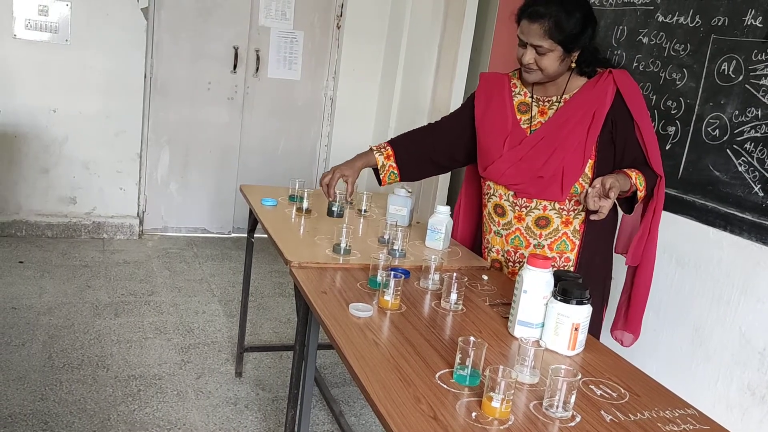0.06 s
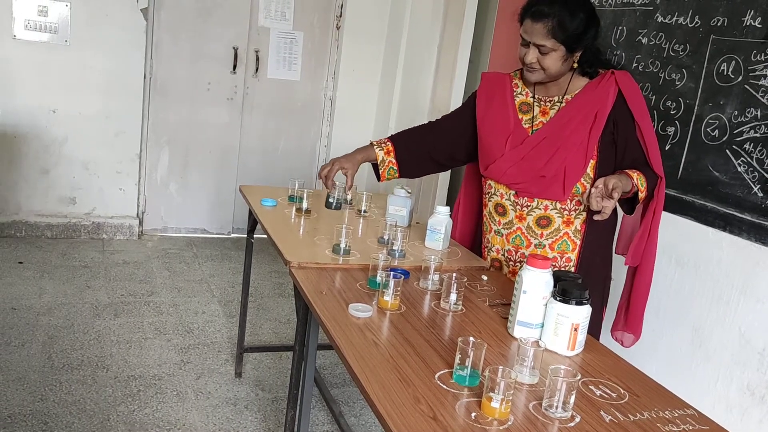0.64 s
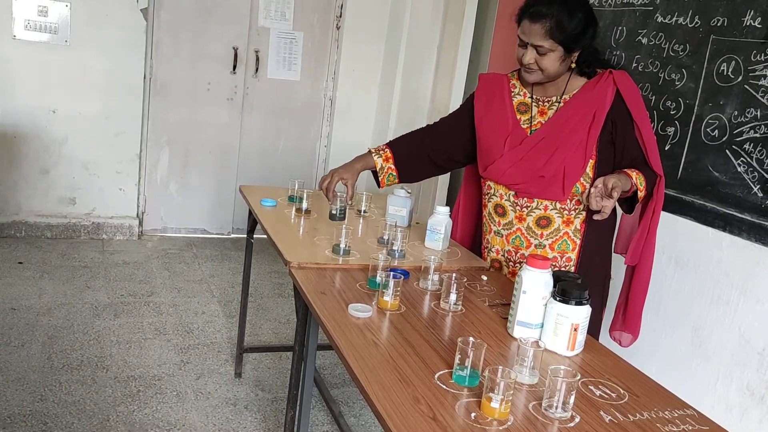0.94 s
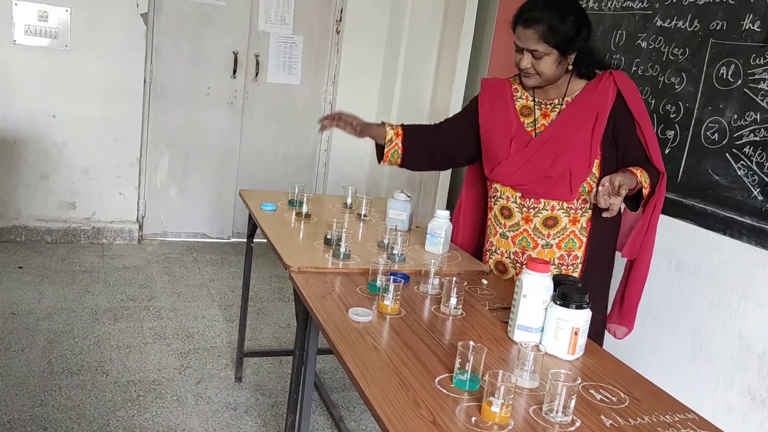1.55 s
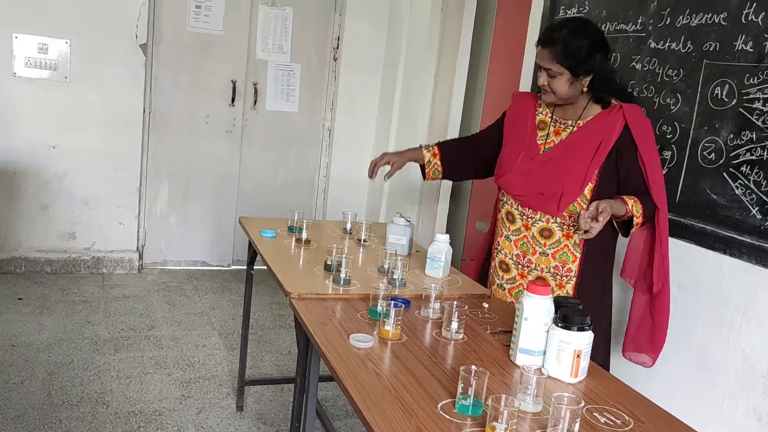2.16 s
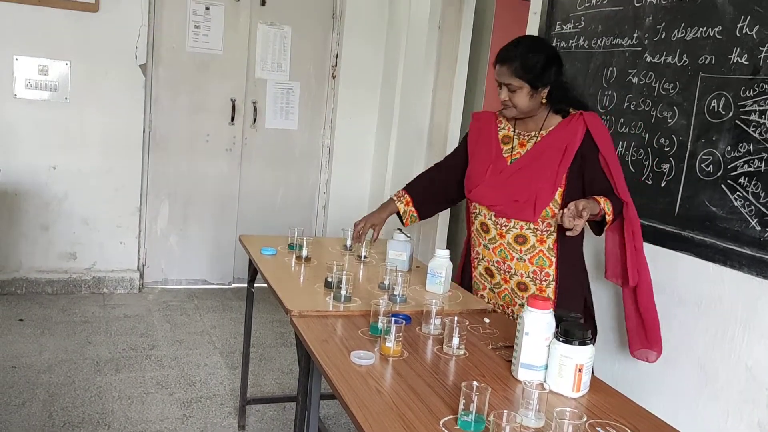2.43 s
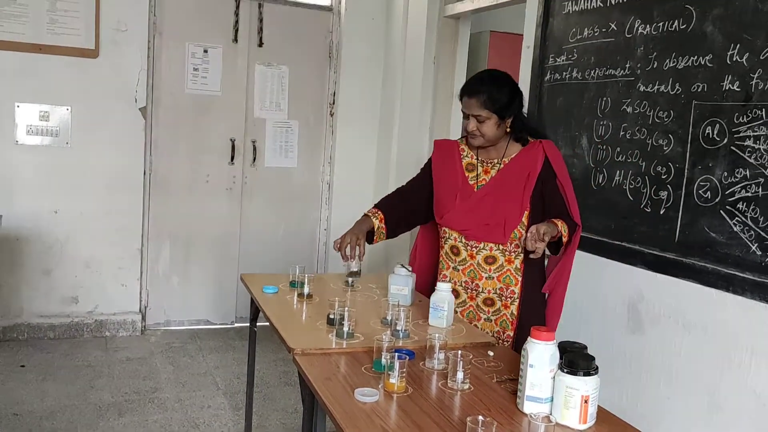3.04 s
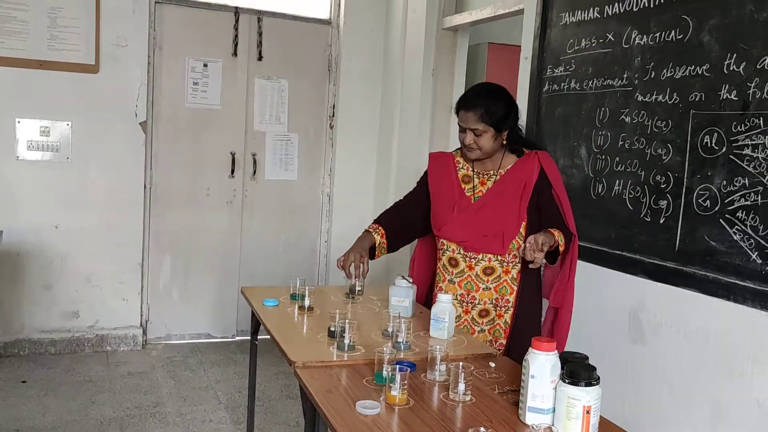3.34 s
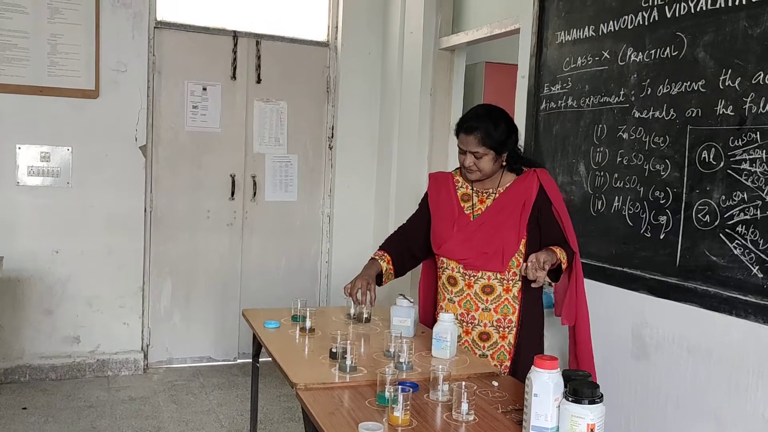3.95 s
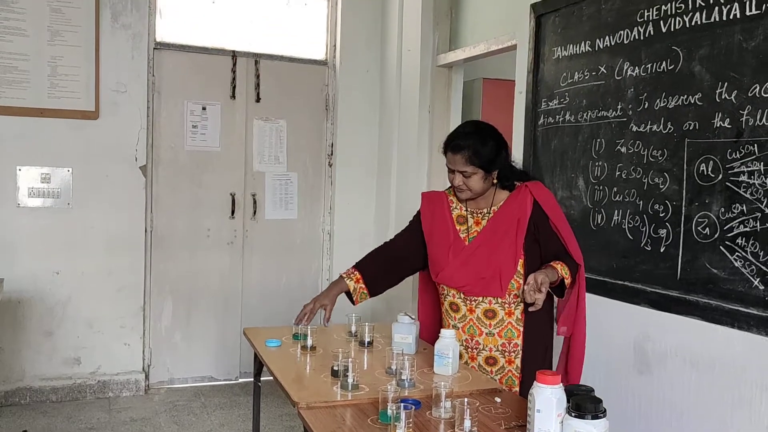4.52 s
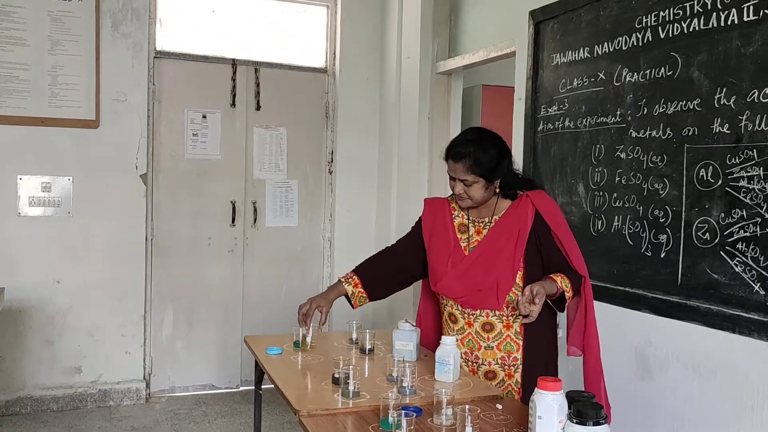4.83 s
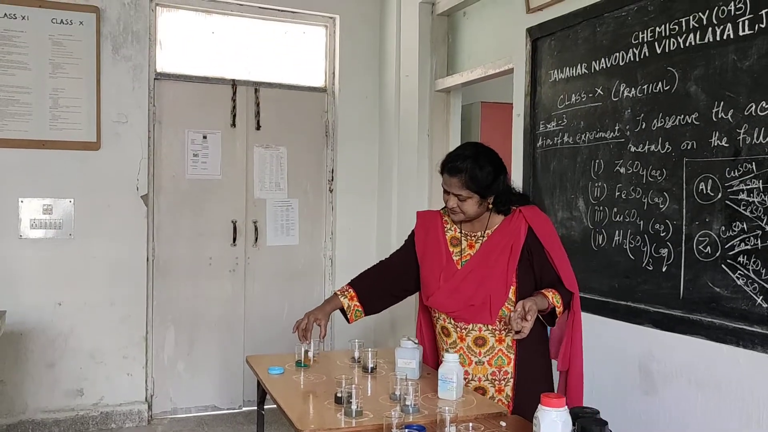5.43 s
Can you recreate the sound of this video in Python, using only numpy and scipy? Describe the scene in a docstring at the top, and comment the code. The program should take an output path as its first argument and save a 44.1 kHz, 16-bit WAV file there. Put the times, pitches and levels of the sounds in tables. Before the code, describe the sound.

A light tick of glass comes first, then a small beaker is set down on a wooden table with a sharp knock that rings around a bare classroom. Clothes and soles brush softly, the glass ticks again in the hand, and a second, duller knock follows. A quiet hush of air and the low rumble of a hand-held microphone lie underneath.

```python
"""In a bare, echoing classroom, small glass beakers are set down twice on a wooden table.
Each landing knocks the table top and sets the room ringing. The glass ticks as it is handled,
and skids faintly on the wood. Clothes and soles brush softly around the knocks,
over the hush of the air and the low rumble of a hand-held microphone."""
import sys
import numpy as np
from scipy import signal
from scipy.fft import rfft, irfft, next_fast_len
from scipy.io import wavfile

SR = 44100
rng = np.random.default_rng(int(sys.argv[2]) if len(sys.argv) > 2 else 0)


def unload_wav(signal):
    """Save mono or channel-first audio to the path in sys.argv[1] as 16-bit WAV at rate SR, clipped to [-1, 1]."""
    wavfile.write(
        sys.argv[1],
        SR,
        np.round(np.clip(np.atleast_2d(signal).T, -1, 1) * 32767).astype(np.int16),
    )


N = 250488
TIME = np.arange(N) / SR
TAIL_TIME = TIME[:2 * SR]   # the room rings for up to 2 s

# How long the room takes to fade by 60 dB: pitch_hz, fade_s
ROOM_FADE = [(100, 3.9), (200, 2.02), (500, 1.764), (1200, 1.4), (2500, 1.303), (5000, 1.12), (9000, 0.83),
             (15000, 0.79)]
# How alike the two sides sound in the room (1 = the same, 0 = unrelated): pitch_hz, likeness
SIDE_LIKENESS = [(35, 0.73), (70, 1), (140, 0.91), (290, 0.84), (640, 0.49), (1400, -0.22), (3000, .02),
                 (15000, -0.082)]
# Notes that ring between the walls: pitch_hz, level_db
ROOM_NOTES = [(166, -51.5), (289, -49.5), (315, -47.5), (411, -46), (606, -43.5), (757, -48), (919, -44),
              (1041, -49.5), (1235, -39), (1291, -56.5), (1338, -49.5), (1411, -54.5), (1581, -52),
              (1711, -50.5), (1813, -61.5), (1901, -57), (2236, -56), (2348, -54.5)]
# Tone of the still air, from bass to treble: pitch_hz, level_db
AIR_TONE = [(35, -44.5), (60, -12), (129, -4), (152, -11), (291, -17.5), (433, -21), (486, -22.5),
            (1420, -27), (1830, -27.5), (3580, -31), (15500, -30.5)]
# Tone of rubbing clothes and soles: pitch_hz, level_db
BRUSH_TONE = [(350, -28.5), (800, -4.5), (1500, -4.5), (3400, -4), (5000, -6.5), (10000, -5),
              (15500, -13.5)]
# Strokes of clothes and soles: peak_s, level_db, width_s, treble_db
BRUSH_STROKES = [(1.324, -50.5, 0.058, 6), (1.657, -62.5, 0.051, 11.5), (2.003, -52, 0.07, 0.5),
                 (2.341, -53, 0.051, 9.5), (2.563, -61, 0.24, -14), (2.869, -52.5, 0.17, 1.5),
                 (3.398, -60, 0.17, -5.5), (4.379, -43, 0.071, -3), (4.893, -65, 0.083, 5),
                 (5.04, -57.5, .092, -8.5)]
# Skids of a beaker on the wood: start_s, length_s, level_db, pitch_hz
BEAKER_SKIDS = [(1.29, .035, -59, 1390), (2.554, .021, -64, 1170)]
# Light touches on the glass: start_s, level_db, click_hz, ring_db
GLASS_TICKS = [(0.0341, -29, 4340, -18), (1.005, -46, 3000, -13), (2.912, -27, 10300, -45),
               (2.921, -33.5, 11160, -27)]
# Notes of a held beaker: multiple_of_glass_hz, level_db, fade_s
GLASS_NOTES = [(.6, -13, 0.0078), (1, 4.5, 0.02), (1.95, -2.5, 0.008), (3.26, -8, 0.013)]
# Tone of the table top under a hard blow: pitch_hz, level_db
TABLE_TONE = [(50, -38), (120, -15), (180, -6), (300, -6.5), (600, -2), (1000, -2.5), (1350, 3), (1750, -5),
              (2400, -7), (3300, -15.5), (4400, -22.5), (6000, -25.5), (10500, -37), (15000, -48)]
# Notes that ring in the table top: pitch_hz, level_db, fade_s
TABLE_NOTES = [(303, -59, 0.091), (629.8, -56.5, 0.19), (1120, -46, 0.044), (1394, -49.5, 0.032),
               (1470, -56.5, 0.062), (1820, -67, .06), (2264, -60, .09)]
# Beaker landings, each with a wall echo: start_s, level_db, treble_db, echo_delay_s, echo_db
BEAKER_LANDINGS = [(1.3242, 10, 2.5, .0183, -5.5), (4.1298, 7.5, -8, 0.0049, 3.5)]
# Tone of the rumble from the hand on the microphone: pitch_hz, level_db
RUMBLE_TONE = [(12, -3.0), (24, -12), (36, 1.5), (50, -27), (80, -18), (250, -77.5), (1000, -100)]


def from_db(db):
    """Turn decibels into a number to multiply by."""
    return 10 ** (np.asarray(db) / 20)


def at_hz(table, hz):
    """Read a table between its rows, giving every octave equal space."""
    known_hz, values = np.transpose(table)
    return np.interp(np.log(np.maximum(hz, 1)), np.log(known_hz), values)


def add(track, sound, start_s):
    """Mix a sound into the track at its start time."""
    start = int(round(start_s * SR))
    track[..., start:start + sound.shape[-1]] += sound[..., :N - start]


def low_pass(sound, corner_hz, order):
    """Dull a sound above the corner pitch."""
    return signal.sosfilt(signal.butter(order, corner_hz, fs=SR, output="sos"), sound)


def ring(hz, fade_s, t, phase=0):
    """A pure note that drops by 60 dB in fade_s."""
    return np.sin(2 * np.pi * hz * t + phase) * np.exp(-np.log(1000) * t / fade_s)


def click(hz, t):
    """A sharp contact of height 1 that dies within six cycles."""
    pulse = np.diff(ring(hz, 6 / hz, t), prepend=0)
    return pulse / np.abs(pulse).max()


def all_around_spectrum(size):
    """Noise arriving from all sides: left and right are alike in the bass, unrelated in the treble."""
    hz = np.fft.rfftfreq(size, 1 / SR)
    mid, side = rfft(rng.standard_normal((2, size)))
    alike = np.clip(at_hz(SIDE_LIKENESS, hz), -1, 1)
    return hz, np.sqrt((1 + alike) / 2) * mid + np.sqrt((1 - alike) / 2) * side * [[1], [-1]]


def noise(tone):
    """Stereo noise with the given tone and an average strength (rms) of 1."""
    hz, white = all_around_spectrum(next_fast_len(N))
    shaped = irfft(white * from_db(at_hz(tone, hz)))[:, :N]
    return shaped / np.sqrt(np.mean(shaped ** 2) + 1e-20)


def classroom(tail_db, early_db, early_s):
    """Echoes off the bare room: a quick early cluster, then a tail in which the bass lasts longest."""
    hz, white = all_around_spectrum(len(TAIL_TIME))
    bands_hz = np.geomspace(60, 16000, 14)
    echoes = 0
    for band_hz, share in zip(bands_hz, np.eye(len(bands_hz))):
        band = irfft(white * np.interp(hz, bands_hz, share))
        echoes = echoes + band * np.exp(-np.log(1000) * TAIL_TIME / at_hz(ROOM_FADE, band_hz))
    build_up = np.clip(TAIL_TIME / .0015, 0, 1)
    return echoes * build_up * (from_db(tail_db) + from_db(early_db) * np.exp(-TAIL_TIME / early_s))


def through(sound, echoes):
    """Play a sound through the room's echoes."""
    return signal.fftconvolve(np.atleast_2d(sound), echoes, axes=-1)


def room_air():
    """The steady hush of a still room."""
    return from_db(-67) * noise(AIR_TONE)


def hand_rumble(level_db=-59.5, waver_db=1, wavers_per_s=2.5):
    """The hand holding the microphone makes a low rumble that wavers by chance."""
    rumble = noise(RUMBLE_TONE)
    waver = np.interp(TIME * wavers_per_s, np.arange(64), rng.standard_normal(64))
    return from_db(level_db + waver_db * waver) * rumble


def clothes_and_soles(rise_share=.55):
    """Dry rubbing swells and fades with each stroke, and the room carries it on."""
    rubbing = noise(BRUSH_TONE)
    dull = low_pass(rubbing, corner_hz=3480, order=1)
    treble = rubbing - dull
    strokes = 0
    for peak_s, level_db, width_s, treble_db in BRUSH_STROKES:
        slope_s = width_s * np.where(TIME < peak_s, rise_share, 1 - rise_share)
        swell = np.exp(-.5 * ((TIME - peak_s) / slope_s) ** 2)
        strokes = strokes + from_db(level_db) * swell * (dull + from_db(treble_db) * treble)
    echoes = classroom(tail_db=-35.5, early_db=-27, early_s=.014)
    echoes /= np.sqrt(np.sum(echoes ** 2) / 2)   # smear the strokes but keep their strength
    return through(strokes, echoes)[:, :N]


def beaker_skids(slips_per_s=700, wood_fade_s=.01):
    """The base sticks and slips in quick, uneven jerks that keep one note of the table ringing."""
    out, t = np.zeros((2, N)), TIME[:SR // 10]
    for start_s, length_s, level_db, pitch_hz in BEAKER_SKIDS:
        slipping = (rng.random(len(t)) < slips_per_s / SR) & (t < length_s)
        jerks = slipping * rng.standard_normal(len(t))
        rub = signal.fftconvolve(jerks, ring(pitch_hz, wood_fade_s, t))
        strength = np.sqrt(np.sum(rub ** 2) / (length_s * SR) + 1e-20)
        skid = from_db(level_db) * rub / strength
        add(out, skid, start_s)
        add(out, through(skid, classroom(tail_db=-39.5, early_db=-33.5, early_s=.012)), start_s)
    return out


def glass_ticks(glass_hz=2250):
    """A touch makes the glass click and ring, and the fingers soon stop the ringing."""
    out, t = np.zeros((2, N)), TIME[:SR // 10]
    glass = sum(from_db(db) * ring(multiple * glass_hz, fade_s, t) for multiple, db, fade_s in GLASS_NOTES)
    for start_s, level_db, click_hz, ring_db in GLASS_TICKS:
        contact = from_db(level_db) * click(click_hz, t)
        ringing = from_db(level_db + ring_db) * glass
        add(out, contact + ringing, start_s)
        into_room = contact + from_db(-2.5) * ringing   # the hand shields the ring from the room
        add(out, through(into_room, classroom(tail_db=-39, early_db=-27.5, early_s=.016)), start_s)
    return out


def room_ringing(level_db, build_s):
    """Notes between the walls swell and die slowly; high ones reach the two sides out of step."""
    out = 0
    for hz, note_db in ROOM_NOTES:
        alike = np.clip(at_hz(SIDE_LIKENESS, hz), -1, 1)
        apart = np.arccos(alike) / 2 * rng.choice([-1, 1])
        phase = rng.uniform(0, 2 * np.pi) + apart * np.array([[1], [-1]])
        out = out + from_db(note_db + level_db) * ring(hz, at_hz(ROOM_FADE, hz), TAIL_TIME, phase)
    return out * (1 - np.exp(-TAIL_TIME / build_s))


def table_top(treble_db, t, corner_hz=2040):
    """Struck wood gives a sharp rap and rings briefly; a softer blow has less treble."""
    size = len(t)
    hz = np.fft.rfftfreq(size, 1 / SR)
    tone_db = at_hz(TABLE_TONE, hz) + treble_db * hz ** 4 / (hz ** 4 + corner_hz ** 4)
    # Pack this tone into the most sudden pulse possible (minimum phase).
    cepstrum = irfft(np.log(from_db(tone_db)))
    cepstrum[1:size // 2] *= 2
    cepstrum[size // 2 + 1:] = 0
    rap = irfft(np.exp(rfft(cepstrum)))
    return rap + sum(from_db(db) * ring(pitch_hz, fade_s, t) for pitch_hz, db, fade_s in TABLE_NOTES)


def beaker_knocks(click_db=-49.5, click_hz=10020):
    """A landing beaker clicks and knocks the table top, which sets the room ringing."""
    out, t = np.zeros((2, N)), TIME[:8192]
    for start_s, level_db, treble_db, echo_delay_s, echo_db in BEAKER_LANDINGS:
        knock = -from_db(level_db) * table_top(treble_db, t)
        # The top sends its treble upward, past the microphone.
        direct = from_db(1.5) * low_pass(knock, corner_hz=3480, order=2)
        add(out, direct, start_s)
        add(out, from_db(echo_db) * direct, start_s + echo_delay_s)
        add(out, through(knock, classroom(tail_db=-24, early_db=-25, early_s=.051)), start_s)
        add(out, room_ringing(level_db=2.5, build_s=.0043), start_s)
        base_click = from_db(level_db + click_db) * click(click_hz, t)
        add(out, base_click, start_s)
        add(out, through(base_click, classroom(tail_db=-23, early_db=-20.5, early_s=.032)), start_s)
    return out


def scene():
    """All the sounds together; the knocks lean a little right, the brushing a little left."""
    leftward = np.array([[1], [-1]])
    knocks = from_db(-.35 * leftward) * beaker_knocks()
    ticks = glass_ticks()
    brushing = from_db(.45 * leftward) * clothes_and_soles()
    return knocks + ticks + brushing + hand_rumble() + room_air() + beaker_skids()


def record(dry):
    """The very highest treble is cut off steeply."""
    cutoff_hz = 15800
    return signal.sosfilt(signal.ellip(10, .1, 80, cutoff_hz, fs=SR, output="sos"), dry)


dry = scene()
out = record(dry)
unload_wav(out)
```